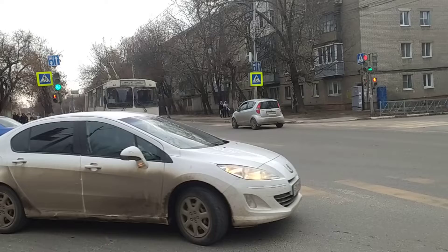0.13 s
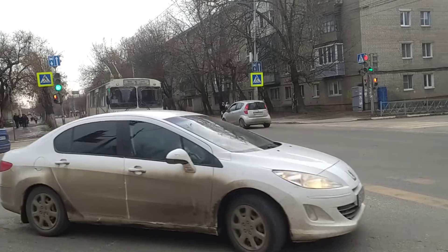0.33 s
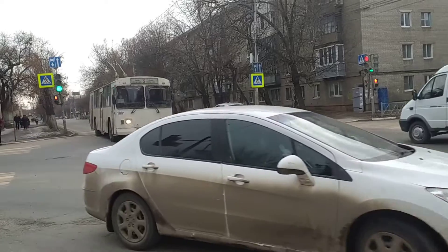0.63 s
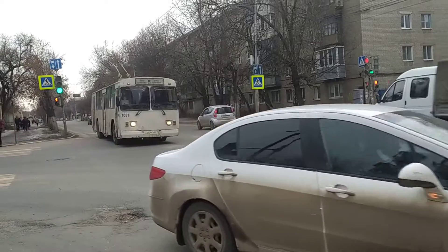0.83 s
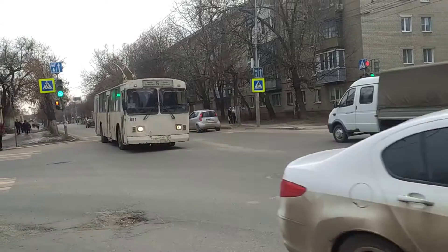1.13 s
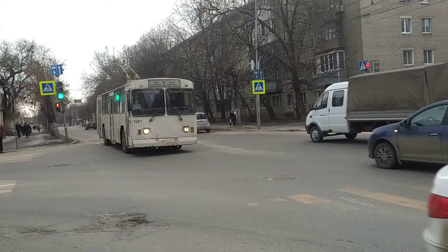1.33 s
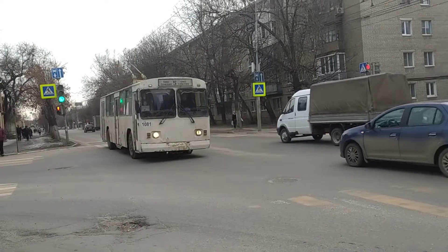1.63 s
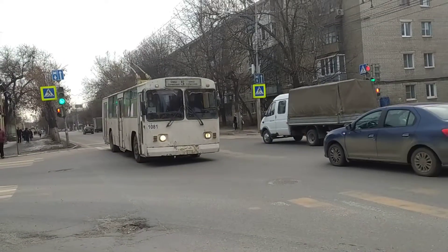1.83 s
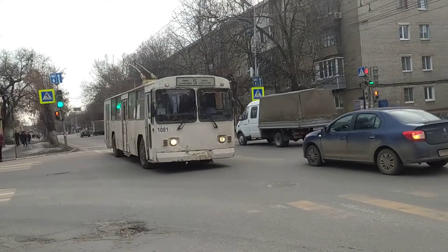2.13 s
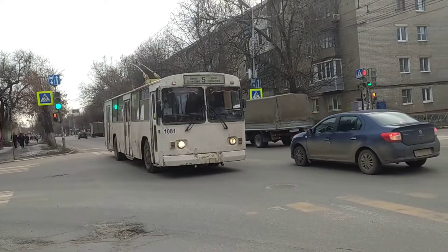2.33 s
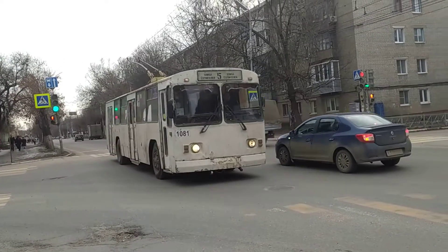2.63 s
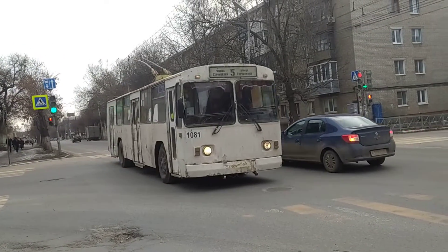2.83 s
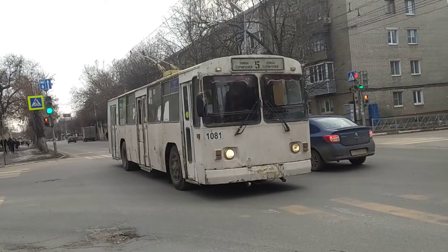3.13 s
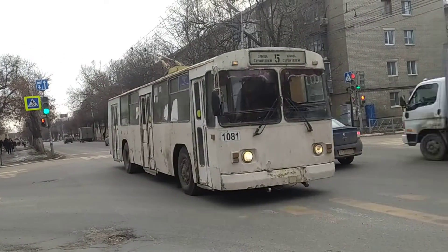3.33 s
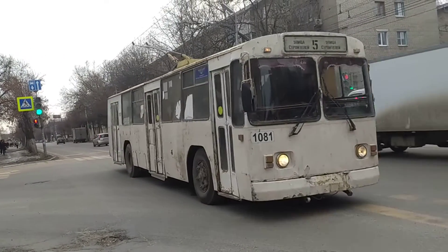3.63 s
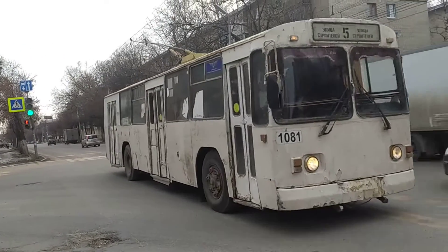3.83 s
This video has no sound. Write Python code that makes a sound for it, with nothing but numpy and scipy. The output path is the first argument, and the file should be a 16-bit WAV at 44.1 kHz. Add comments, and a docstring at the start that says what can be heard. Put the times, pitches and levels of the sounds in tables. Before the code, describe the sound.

Kerbside stereo capture of cars passing: abrupt start, gritty tyre roar with snapping stones, then a low rising engine and very high, short trolleybus brake squeals over traffic wash and wind knocks on the microphone.

```python
"""A damp city crossing at the kerb, heard from an abrupt start after a moment of silence.
A near car's tyres roar, spray and crunch grit (shaped noise, grains and bursts); a second car's tread whirrs
in a narrow noise band. An engine pulls away (summed harmonics) and trolleybus brakes squeal (gliding tones
with a street tail). Wind thumps on two microphone ports (noise swells, decaying sines) over traffic noise."""
import sys
import numpy as np
from scipy import signal
from scipy.fft import rfft, irfft, next_fast_len
from scipy.io import wavfile
from scipy.ndimage import uniform_filter1d, minimum_filter1d, map_coordinates

SR = 44100
rng = np.random.default_rng(int(sys.argv[2]) if len(sys.argv) > 2 else 0)


def waveform_to_disk(signal):
    """Save audio, clipped to [-1, 1], as 16-bit WAV at the path in sys.argv[1]."""
    frames = np.transpose(np.atleast_2d(signal))
    scaled = np.clip(frames, -1, 1) * 32767
    samples = np.round(scaled).astype(np.int16)
    wavfile.write(sys.argv[1], SR, samples)


N = 176400

# Layer levels. Each row: time in seconds, level in dB.
CARS_LEVEL_DB = [(.4, -28.5), (.55, -27.5), (.8, -23), (.9, -23), (1.03, -22.5), (1.18, -22), (1.34, -26.5),
                 (1.55, -23.5), (1.8, -25.5), (2.05, -26.5), (2.5, -29.5), (3.3, -34), (4, -43)]
SPRAY_LEVEL_DB = [(.4, -35), (.56, -38.5), (.7, -28), (.8, -34), (.9, -28.5), (1.03, -33), (1.2, -29),
                  (1.38, -29), (1.48, -33.5), (1.8, -31), (1.97, -41), (2.3, -65)]
WHIRR_LEVEL_DB = [(1.1, -61), (1.5, -33), (1.8, -28.5), (2.05, -43), (2.6, -43)]
HISS_LEVEL_DB = [(.4, -33.5), (.7, -31), (1.8, -36.5), (2.05, -36), (2.2, -34), (2.6, -36), (3.45, -35.5),
                 (3.8, -39), (4, -42)]
TRAFFIC_LEVEL_DB = [(.4, -22.5), (1.2, -25), (2, -26), (2.6, -25), (3.3, -24), (3.6, -26), (4, -27.5)]
RUMBLE_LEVEL_DB = [(.4, -35), (.5, -27.5), (1.2, -31), (1.85, -30.5), (2.0, -34), (2.24, -30), (2.33, -38),
                   (2.5, -33), (2.95, -28), (3.3, -35), (4, -32)]

# Noise spectra. Each row: frequency in Hz, relative density in dB per Hz.
CARS_SPECTRUM = [(100, -3), (280, -4), (600, -5.5), (950, 3), (1300, 4), (1750, -2.5), (2150, 1),
                 (2450, -4), (2800, -7), (3500, -13), (4700, -39), (9000, -35), (14000, -55)]
GRIT_SPECTRUM = [(100, -44), (500, -1.5), (900, -3), (1400, -2.5), (2300, 3), (3000, -11), (4700, -40),
                 (8800, -16), (14000, -57)]  # popping stones
CRUNCH_SPECTRUM = [(60, -27), (250, 9.5), (600, -2.5), (1300, 10), (2300, 0.5), (3000, -4), (4700, -16),
                   (6000, -28), (8800, -6.5), (10500, -29), (15000, -47)]
POP_SPECTRUM = [(100, -20), (600, -19), (1000, 1), (1450, 15), (1900, -11), (2300, -7), (3000, -11),
                (4700, -32), (14000, -55)]  # snapping stones
SPRAY_SPECTRUM = [(2000, -25), (3300, 0), (4800, -8), (5800, 0.5), (7000, -1), (8600, 5), (9100, 1.5),
                  (9600, -4.5), (11000, -13), (14500, -19.5)]
WHIRR_SPECTRUM = [(800, -14), (1500, -9), (1900, 1), (2250, 9), (2550, -1.5), (3000, -10), (4500, -48)]
PUFF_SPECTRUM = [(20, -13), (80, -4), (165, 2.5), (270, -1), (420, -9), (800, -22), (1400, -26.5),
                 (3000, -72), (9000, -76)]
CRACKLE_SPECTRUM = [(100, -21), (350, 3), (550, 3), (850, -4), (1300, -7), (3000, -34), (9000, -65)]
HISS_SPECTRUM = [(1500, -20), (3400, 1), (4800, -3), (5800, 1.5), (7000, 0), (8800, 2.5), (9500, -3),
                 (10300, -7.5), (12000, -20), (14500, -21), (16000, -53)]
TRAFFIC_SPECTRUM = [(30, -45), (85, 0.5), (130, -12.5), (180, 6.5), (205, 1.5), (280, 1), (420, -5.5),
                    (700, -9.5), (1100, -7), (1600, -10.5), (2200, -19), (2800, -20), (4500, -31),
                    (9000, -29), (14000, -62)]
RUMBLE_SPECTRUM = [(10, -8), (25, -6), (45, -2), (70, -5), (110, -13), (200, -28), (600, -77)]

# Left-right likeness. Each row: frequency in Hz, correlation from -1 to 1.
CARS_ALIKE = [(200, 0.43), (600, 0.84), (1000, -0.48), (1600, -0.6), (1950, -0.067), (2200, 0.82),
              (2550, 0.12), (2900, -0.22), (4000, 0.18)]
TRAFFIC_ALIKE = [(60, 0.14), (200, 0.68), (600, 0.52), (1000, 0.082), (1600, -0.76), (2100, 0.76),
                 (2500, -1), (2900, 0.25), (4100, -0.3), (5000, -0.16)]
# Channel balance. Each row: frequency in Hz, left minus right in dB.
CARS_SIDE_DB = [(200, 0.5), (750, -2), (1100, -0.5), (1800, -5), (2400, -3), (3300, 4), (5000, -2.5)]
TRAFFIC_SIDE_DB = [(100, 3), (700, 0.5), (1200, 1.5), (1600, 3), (2200, -3), (3400, 14.5), (4500, 3)]
# Tyre phase. Each row: frequency in Hz, left lead in radians.
CARS_LEAD_RAD = [(150, -1.1), (500, 0.36), (800, 0.99), (1100, -0.26), (1500, -0.27), (2000, -0.4)]

# Tyres crunching over grit. Each row: start in seconds, starting level in dB, decay time in seconds.
CRUNCHES = [(0.603, -15, 0.013), (.865, -15.5, 0.0061), (0.913, -15.5, 0.0092), (0.926, -15.5, 0.0074),
            (1.046, -19, 0.0088), (1.094, -16, 0.013), (1.116, -11.5, 0.008), (1.181, -16, 0.008),
            (1.187, -15.5, 0.032), (1.412, -23, 0.0059), (1.54, -14.5, 0.014), (1.629, -20, 0.0068),
            (1.718, -22, 0.0072), (1.789, -13, 0.006), (1.968, -19, 0.0049)]
# Stones snapping from under the rubber. Each row: time in seconds, impulse level in dB.
POPS = [(.864, -2), (.8885, 4), (.909, -3), (.9515, -2), (1.2155, -4), (1.404, -2), (1.543, -5), (1.789, 1)]
# Ticks of flung grit. Each row: start in seconds, starting level in dB.
TICKS = [(0.808, -21), (0.923, -28), (1.096, -27), (1.111, -18), (1.121, -17), (1.19, -22), (1.279, -25),
         (1.344, -26), (1.403, -15.5), (1.424, -22), (1.575, -23), (1.716, -22), (3.843, -27)]
# Engine pulling away. Each row: time in seconds, mean firing rate in Hz, level in dB.
ENGINE = [(.4, 37, -39), (1.0, 38.14, -46), (1.22, 38.9, -27.5), (1.45, 41.05, -44), (1.85, 45.2, -27.5),
          (2.3, 49.9, -32.5), (2.6, 54.2, -26), (3.2, 59.8, -33.5), (3.55, 59.4, -38.5), (4, 60.3, -46)]
# Engine orders. Each row: multiple of the firing rate, mean relative level in dB.
ENGINE_ORDERS = [(1, 2), (2, -19), (3, -6), (4, -8)]
# Brake squeals. Each row: start in seconds, hold in seconds, starting pitch in Hz before waver, level in dB,
# glide in Hz per second, rise time in seconds, roughness from 0 to 1.
SQUEALS = [(2.124, 0.016, 5585, -29.5, 300, .009, .2), (2.156, 0.064, 5606, -30, 500, 0.0057, 0.37),
           (2.252, 0.02, 5700, -36, 0, .007, .5), (2.115, 0.069, 11100, -49, 900, .012, .9),
           (2.149, 0.01, 13000, -35, 0, 0.013, 0.5), (2.183, 0.029, 12950, -20.5, 0, 0.0067, 0.3),
           (2.19, .11, 12700, -38, 0, .007, .9), (2.258, 0.03, 12960, -19.5, 200, 0.0059, 0.06),
           (2.351, 0.017, 10900, -36, 600, 0.0097, .4), (2.87, 0.037, 10900, -40.5, -400, .012, .5),
           (3.095, 0.013, 12900, -18.5, 0, 0.0062, .12), (3.143, 0.0093, 12930, -29, 0, 0.0064, 0.1),
           (3.173, 0.074, 12960, -30, 200, 0.0055, .2), (3.398, 0.031, 12940, -34, 0, .017, .25),
           (3.538, 0.024, 12910, -25.5, 0, 0.0089, 0.2), (3.684, 0.036, 12910, -40, 0, .009, 0.42),
           (3.726, 0.045, 13000, -31.5, 3, 0.011, .35), (3.842, 0.015, 12970, -37.5, 0, .01, .3),
           (3.89, 0.051, 12900, -35, -0.5, .012, 0.5), (3.95, .06, 12910, -30, 3, .012, .6)]
# Street reverberation. Each row: frequency in Hz, 60 dB decay time in seconds.
STREET_T60 = [(2000, .35), (5600, 0.37), (13000, 0.32)]
# Wind puffs. Each row: centre in seconds, thump level in dB, Gaussian width (standard deviation) in seconds,
# pan (1 left, -1 right, clipped beyond), crackle level in dB relative to the thump.
PUFFS = [(.465, -14.5, 0.015, 0.82, -23), (0.703, -18.5, 0.0071, 0.97, 3.5), (1.06, -19, 0.027, -1.24, -31),
         (1.16, -17.5, 0.02, -0.16, -18), (1.235, -19.5, 0.024, -0.24, 1.5),
         (1.43, -18, 0.015, -0.84, -3.5), (1.801, -16.5, 0.013, 0.79, -9), (2.064, -17, 0.017, 0.93, -29),
         (2.249, -13, .012, 0.99, -0.5), (2.497, -12.5, 0.008, -0.63, -6.5),
         (2.555, -14.5, 0.013, -1.2, -6.5), (2.656, -21.5, 0.013, 0.11, -19), (2.77, -18, 0.004, -.3, -1),
         (2.815, -15, 0.017, -1, -7.5), (2.9, -16, 0.022, -0.24, -5.5), (3.003, -21, 0.01, 0.89, 5),
         (3.105, -14, 0.0096, 0.57, -4), (3.19, -21, 0.016, 0.99, -5), (3.239, -19, 0.013, 0.97, -7),
         (3.336, -23, 0.014, 1, 1), (3.405, -17.5, 0.015, 1, -8), (3.625, -30, 0.0042, 1, 9),
         (3.695, -17, 0.011, -0.48, -16), (3.869, -18, 0.019, 0.98, -5.5),
         (3.951, -16.5, 0.037, 0.71, -13.5)]
# Eddies slapping a port. Each row: time in seconds, relative level in dB, pitch in Hz, pan (as for puffs).
SLAPS = [(2.233, -7, 300, 1), (2.247, -7.5, 710, 0.99), (2.254, -5.5, 179, 1), (2.499, -10, 252, -.5),
         (2.556, -15, 217, -0.96), (2.773, -5, 560, 1), (2.888, -11, 520, 1), (2.903, -8, 730, -.4),
         (2.926, -10, 191, -1.2), (3.038, -10, 343, 0.85), (3.413, -2.5, 155, 0.96)]

GRIT_PER_S, GRIT_DB = 220, -5  # level relative to the tread noise
POP_PAN, POP_LAG_S = -.35, 0.000068  # stones lie to the right, so the left port hears them late
SPRAY_PER_S, SPRAY_DB = 900, -5  # level relative to the fizz noise
SPURT_DB, SPURTS_PER_S = 1.2, 88
TICK_S = 0.0032
SQUEAL_FALL_S, SQUEAL_WAVER_HZ, ROUGH_KNOTS_PER_S = 0.012, 20.7, 326
SQUEAL_FLICKER_DB, SQUEAL_LEAD_RAD = 1.5, 1.05  # left port leads
NEIGHBOUR_HZ, NEIGHBOUR_DB = 380, -23  # second brake mode: mean offset and level relative to the first
STREET_DB = -11
BREEZE_DB, BREEZE_SWING_DB = -28.5, 5
SLAP_DB, SLAP_DECAY_CYCLES, SLAP_SOFT_CYCLES = 1, .9, .4
START_S, TOP_HZ = .379, 15300
CEILING, LIMIT_S = .82, .004  # limiter target peak and reaction time


def amp(db):
    """Decibels to gain."""
    return 10 ** (np.asarray(db) / 20)


def unit(x):
    """Scale to rms 1."""
    return x / np.sqrt(np.mean(x ** 2) + 1e-20)


def along(points, hz):
    """Read (Hz, value) points on a log frequency axis."""
    f, v = np.transpose(points)
    return np.interp(np.log(hz + 1), np.log(f + 1), v)


def clock():
    """Time of each sample in seconds."""
    return np.arange(N) / SR


def curve(rows, axis=1):
    """One column of a time table, per sample."""
    rows = np.array(rows)
    return np.interp(clock(), rows[:, 0], rows[:, axis])


def wobble(rate):
    """Smooth random curve, rate knots per second."""
    return map_coordinates(rng.standard_normal(SR // 2), [clock() * rate], mode="wrap")


def burst(s, length):
    """Sudden start, exponential fall."""
    t = clock() - s
    return (t >= 0) * np.exp(-np.abs(t) / length)


def filtered(x, response):
    """Multiply the spectrum of x by a response of frequency."""
    m = next_fast_len(N + SR // 2)
    return irfft(rfft(x, m) * response(np.fft.rfftfreq(m, 1 / SR)), m)[..., :N]


def shaped(x, spectrum):
    """Give x a spectrum; white input keeps its power."""
    return filtered(x, lambda hz: unit(amp(along(spectrum, hz))))


def coloured(x, spectrum):
    """Give x a spectrum, at rms 1."""
    return unit(shaped(x, spectrum))


def noise(patchy_db=0):
    """Two unrelated noises with shared time-frequency patches of random gain."""
    z = signal.stft(rng.standard_normal((2, N)), nperseg=512)[2]
    field = uniform_filter1d(rng.standard_normal(z.shape[1:]), size=6, axis=0)
    field = uniform_filter1d(field, size=8, axis=1)
    patchy = z * amp(patchy_db * unit(field))
    return unit(signal.istft(patchy, nperseg=512)[1][:, :N])


def grains(per_s, scatter_db):
    """Random tiny impacts of uneven size, with independent signs on two channels."""
    hit = rng.random(N) < per_s / SR
    size = amp(scatter_db * np.clip(rng.standard_normal(N), -2, 2))
    return unit(hit * size * rng.choice([-1, 1], (2, N)))


def spread(pair, alike, side=((100, 0),), lead=((100, 0),)):
    """Mix two unrelated signals to left and right with a given likeness, balance and phase lead."""
    def mid_side_gains(hz):
        turn = np.arccos(np.clip(along(alike, hz), -1, 1)) / 2
        return np.array([np.cos(turn), np.sin(turn)])

    half = np.array([[.5], [-.5]])

    def port_response(hz):
        return amp(half * along(side, hz)) * np.exp(1j * half * along(lead, hz))

    mid, sides = filtered(pair, mid_side_gains)
    return unit(filtered(np.array([mid + sides, mid - sides]), port_response))


def panned(pan):
    """Left and right gains for a pan from 1 (left) to -1 (right)."""
    return np.sqrt(np.clip([[(1 + pan) / 2], [(1 - pan) / 2]], 0, 1))


def near_tyres():
    """Tread roar with small stones popping in it; bigger ones crunch, a few snap out from under the rubber."""
    stones = coloured(grains(GRIT_PER_S, scatter_db=1.5), GRIT_SPECTRUM)
    tread = coloured(noise(patchy_db=3), CARS_SPECTRUM) + amp(GRIT_DB) * stones
    roar = tread * amp(curve(CARS_LEVEL_DB) + 0.63 * wobble(70))
    crunch_envelope = sum(amp(db) * burst(s, length) for s, db, length in CRUNCHES)
    rolling = roar + shaped(noise() * crunch_envelope, CRUNCH_SPECTRUM)
    blows = np.zeros((2, N))
    for s, db in POPS:
        blows[0, round((s + POP_LAG_S) * SR)] = amp(db)
        blows[1, round(s * SR)] = amp(db)
    snaps = np.sqrt(2) * panned(POP_PAN) * shaped(blows, POP_SPECTRUM)
    # spread() normalises, so the rolling level is restored
    return spread(rolling, CARS_ALIKE, CARS_SIDE_DB, CARS_LEAD_RAD) * rolling.std() + snaps


def spray():
    """Near tyres peel off damp asphalt in quick spurts of fizz and fling grit."""
    fizz = noise(patchy_db=2.0) + amp(SPRAY_DB) * grains(SPRAY_PER_S, scatter_db=4)
    spurts = amp(curve(SPRAY_LEVEL_DB) + SPURT_DB * wobble(SPURTS_PER_S))
    tick_envelope = sum(amp(db) * burst(s, TICK_S) for s, db in TICKS)
    ticks = shaped(noise() * tick_envelope, SPRAY_SPECTRUM)
    return coloured(fizz, SPRAY_SPECTRUM) * spurts + ticks


def tread_whirr():
    """The second car's tread sings in a steady, narrow band as it pulls past."""
    band = coloured(noise(), WHIRR_SPECTRUM)
    return spread(band, [(2000, 0.9)], lead=[(2000, -0.6)]) * amp(curve(WHIRR_LEVEL_DB))


def engine():
    """Low firing orders rise as the engine gathers speed."""
    rate_hz = curve(ENGINE) * (1 + 0.011 * wobble(11))
    phase = 2 * np.pi * np.cumsum(rate_hz) / SR
    tone = np.zeros(N)
    for order, db in ENGINE_ORDERS:
        gain = amp(db + 1.2 * wobble(9.9))
        tone += gain * np.sin(order * phase + rng.uniform(0, 2 * np.pi))
    return unit(tone) * amp(curve(ENGINE, axis=2))


def brakes():
    """Brake shoes catch in short spells and sing on a mode, cleanly or roughly, with a weak neighbour above."""
    out = np.zeros((2, N))
    waver_hz = SQUEAL_WAVER_HZ * wobble(70)
    neighbour_gain = amp(NEIGHBOUR_DB + 3 * wobble(27.4))
    neighbour_phase = 2 * np.pi * np.cumsum(NEIGHBOUR_HZ + 60 * wobble(41)) / SR
    neighbour = neighbour_gain * np.exp(1j * neighbour_phase)
    flicker = amp(SQUEAL_FLICKER_DB * np.array([wobble(45), wobble(50)]))
    ports = flicker * np.exp(.5j * SQUEAL_LEAD_RAD * np.array([[1], [-1]]))
    for s, hold, hz, db, glide, rise, rough in SQUEALS:
        t = clock() - s
        swell = np.exp(np.minimum(t, 0) / rise - np.maximum(t - hold, 0) / SQUEAL_FALL_S)
        pitch_hz = hz + glide * np.clip(t, 0, 2 * hold) + waver_hz
        phase = 2 * np.pi * np.cumsum(pitch_hz) / SR
        roughness = rough * (wobble(ROUGH_KNOTS_PER_S) + 1j * wobble(ROUGH_KNOTS_PER_S))
        grain = (1 + neighbour + roughness) / np.sqrt(1 + 2 * rough ** 2)
        out += amp(db) * swell * np.sqrt(2) * (ports * grain * np.exp(1j * phase)).real
    return out


def street(x):
    """House fronts answer with a thin tail: noise decaying at a rate set by frequency."""
    hz, t, z = signal.stft(rng.standard_normal((2, SR // 2)), SR, nperseg=256)
    decay = amp(-60 * t / along(STREET_T60, hz)[:, None])
    tail = signal.istft(z * decay, SR, nperseg=256)[1]
    return signal.fftconvolve(x, tail / np.linalg.norm(tail[0]), axes=1)[:, :N]


def wind():
    """Eddies thump on each port separately; the sharper ones crackle, over a swinging breeze."""
    thump, crackle = coloured(noise(), PUFF_SPECTRUM), coloured(noise(), CRACKLE_SPECTRUM)
    swing = amp(BREEZE_SWING_DB * np.array([wobble(21.91), wobble(22.15)]))
    out = amp(BREEZE_DB) * unit(coloured(noise(), PUFF_SPECTRUM) * swing)
    for s, db, width, pan, crackle_db in PUFFS:
        swell = np.exp(-.5 * ((clock() - s) / width) ** 2)

        def eddy(x):
            """Noise under the swell, with the swell's own energy."""
            return x * swell * np.linalg.norm(swell) / np.linalg.norm(x * swell, axis=1, keepdims=True)

        out = out + panned(pan) * amp(db) * (eddy(thump) + amp(crackle_db) * eddy(crackle))
    return out


def slaps():
    """A single eddy hits a port with a knock; the smaller the eddy, the higher and shorter the knock."""
    out = np.zeros((2, N))
    for s, db, hz, pan in SLAPS:
        cycles = (clock() - s) * hz
        decay = np.exp(-np.hypot(cycles, SLAP_SOFT_CYCLES) / SLAP_DECAY_CYCLES)
        knock = decay * np.sin(2 * np.pi * (cycles + rng.random()))
        out += panned(pan) * amp(db + SLAP_DB) * knock
    return out


def traffic():
    """Deep rumble, and the wash and hiss of tyres from the whole crossing."""
    rumble = spread(coloured(noise(), RUMBLE_SPECTRUM), [(50, 0.46)])
    wash = spread(coloured(noise(patchy_db=1.5), TRAFFIC_SPECTRUM), TRAFFIC_ALIKE, TRAFFIC_SIDE_DB)
    hiss = coloured(noise(patchy_db=2.5), HISS_SPECTRUM)
    rumble = rumble * amp(curve(RUMBLE_LEVEL_DB) + 1.3 * wobble(7.7))
    wash = wash * amp(curve(TRAFFIC_LEVEL_DB) + 0.073 * wobble(8.3))
    hiss = hiss * amp(curve(HISS_LEVEL_DB) + 0.47 * wobble(29.93))
    return rumble + wash + hiss


def scene():
    """All sources at the kerb; only the squeals feed the street tail."""
    squeal = brakes()
    vehicles = near_tyres() + spray() + tread_whirr() + engine()
    return vehicles + squeal + amp(STREET_DB) * street(squeal) + wind() + slaps() + traffic()


def record(dry):
    """Cut in abruptly, ease the highest peaks with a limiter, keep nothing above the band limit."""
    needed = CEILING / np.maximum(np.abs(dry).max(axis=0), CEILING)
    span = int(LIMIT_S * SR)
    gain = uniform_filter1d(minimum_filter1d(needed, 2 * span), span)
    started = clock() >= START_S
    return filtered(dry * gain * started, lambda hz: hz < TOP_HZ)


dry = scene()
out = record(dry)
waveform_to_disk(out)
```